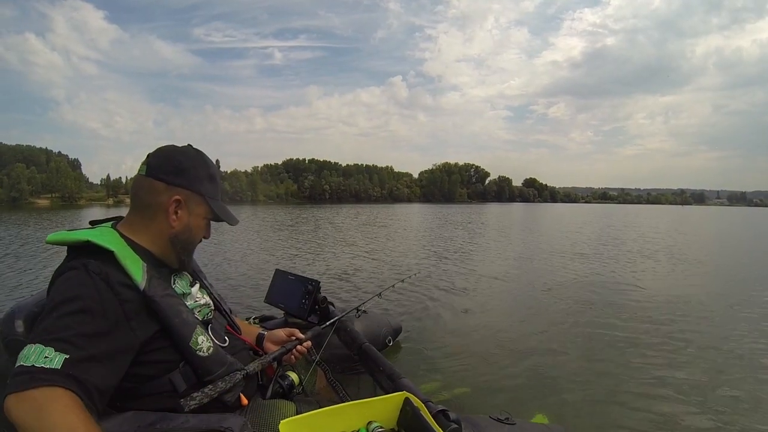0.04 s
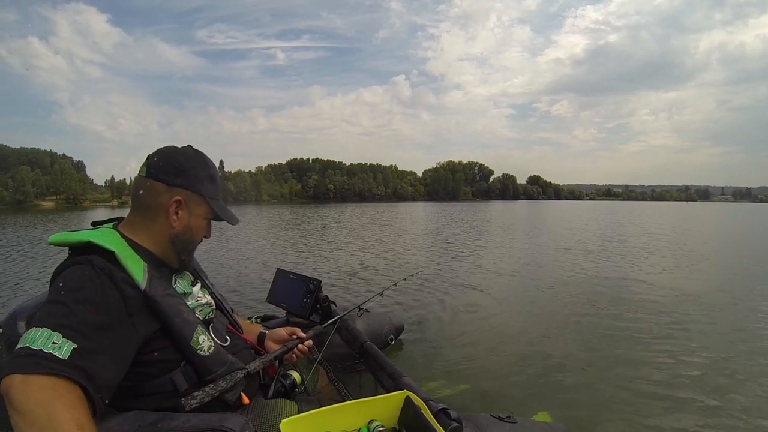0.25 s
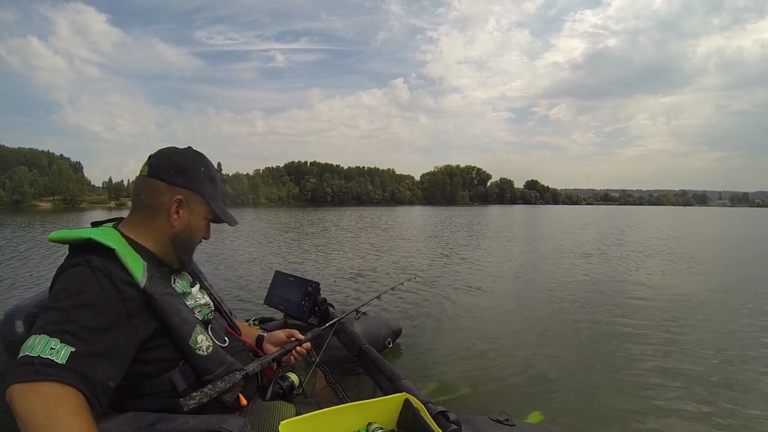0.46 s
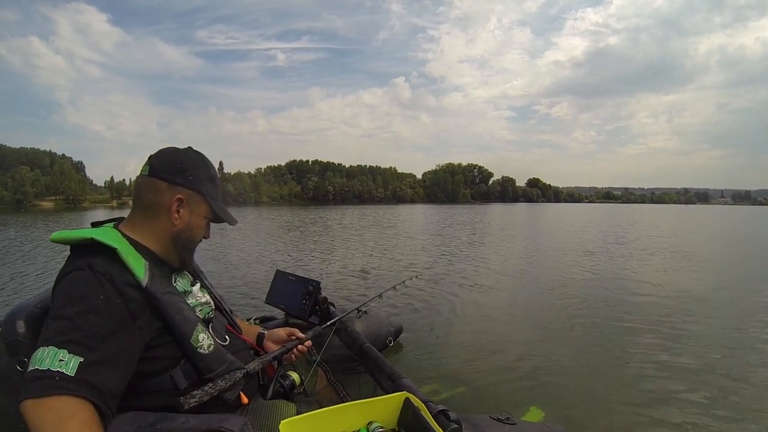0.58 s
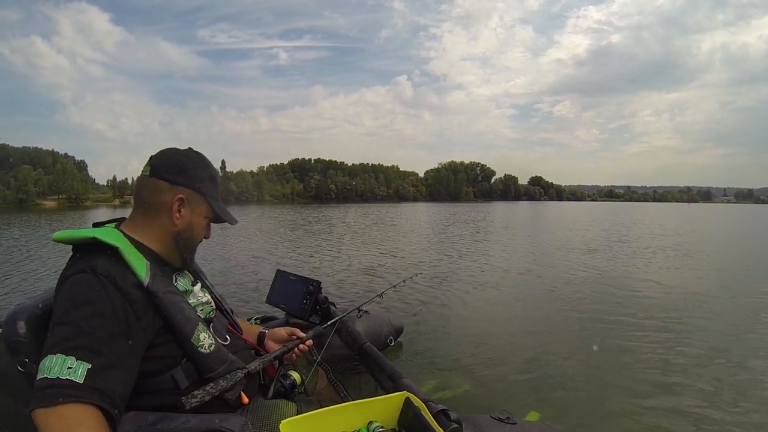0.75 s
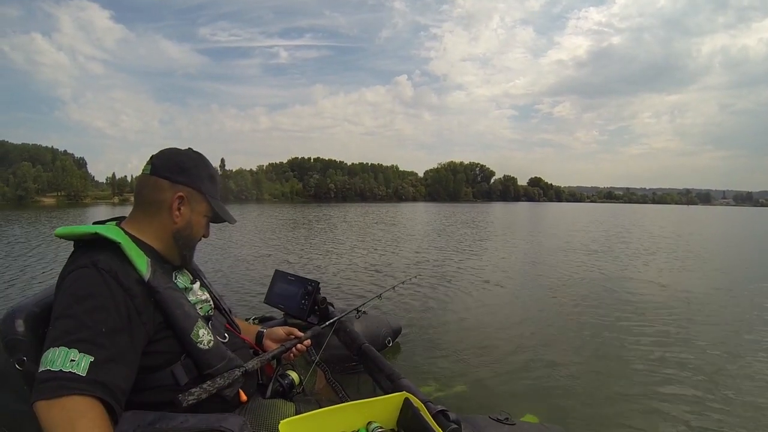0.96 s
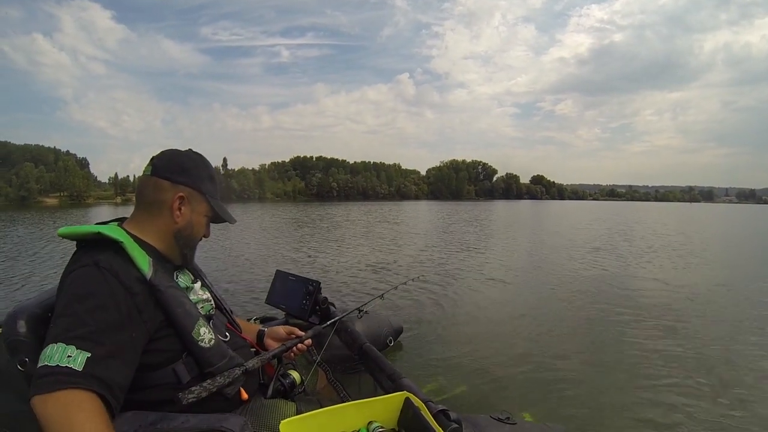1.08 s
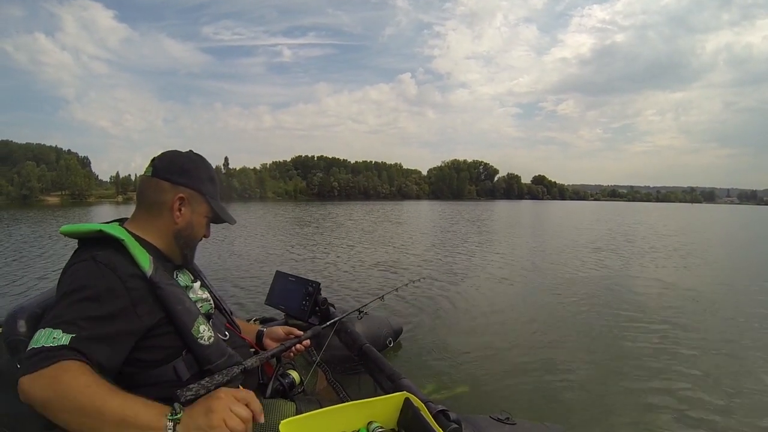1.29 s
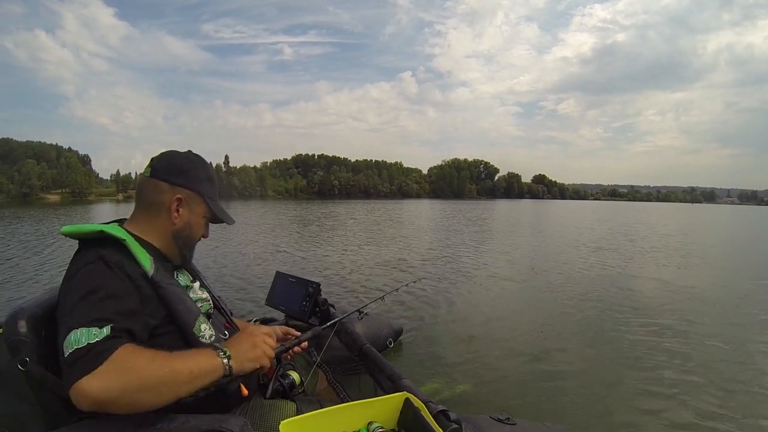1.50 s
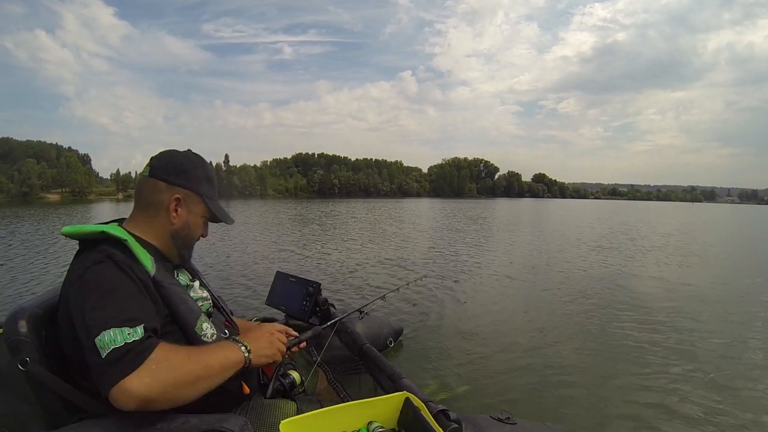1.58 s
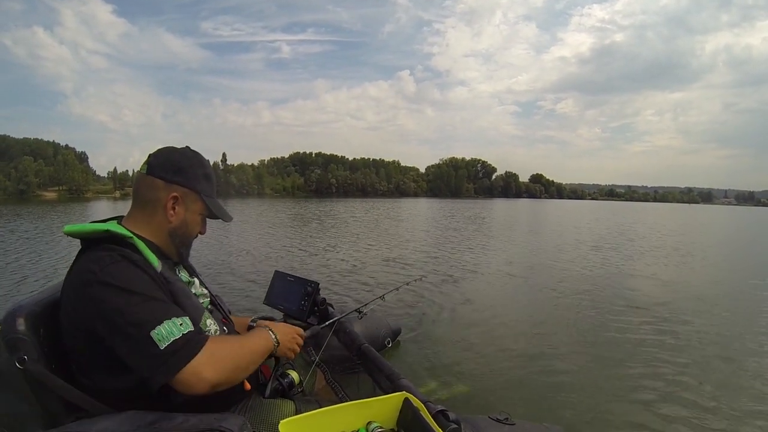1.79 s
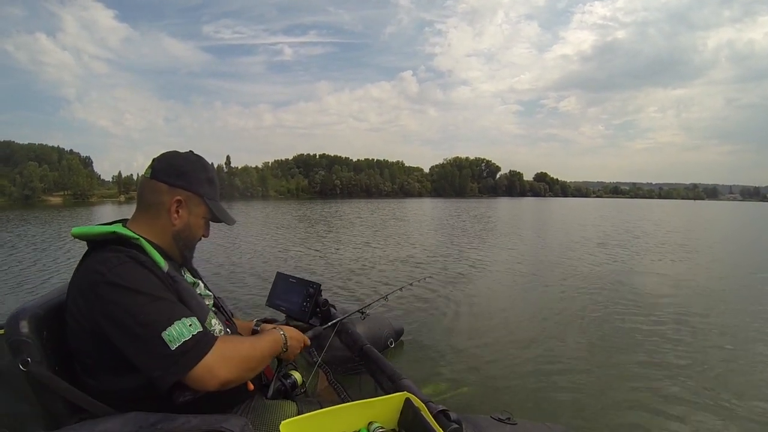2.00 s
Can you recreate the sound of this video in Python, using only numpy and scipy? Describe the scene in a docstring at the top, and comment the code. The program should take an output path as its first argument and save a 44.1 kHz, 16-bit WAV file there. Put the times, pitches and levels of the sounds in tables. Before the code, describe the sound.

A paddle strikes the water once with a loud, hollow plop, close to a small boat. Faint spray and scattered drips follow, over low wind rumble on the microphone and a soft motor hum on an open river.

```python
"""A clonk on a calm river

From a small boat, close up: an angler strikes the water once with a clonk, a paddle that drags air under.
The blade slaps, the air pocket throbs and pinches off as one loud rising bubble; spray and drips follow.
Behind it: wind on the microphone, the river's hush, a low motor hum, faint chirps and one far whistle."""
import sys
import numpy as np
from scipy import signal
from scipy.fft import rfft, irfft
from scipy.io import wavfile
from scipy.ndimage import uniform_filter1d

SR = 44100
rng = np.random.default_rng(int(sys.argv[2]) if len(sys.argv) > 2 else 0)


def to_wav(sig):
    """Store sig (one row per channel, or 1-D mono) as 16-bit WAV at the path in sys.argv[1].

    Samples outside -1..1 are clipped; the rate is SR.
    """
    pcm = np.clip(np.atleast_2d(sig), -1, 1) * 32767
    pcm = np.round(pcm).astype(np.int16)
    wavfile.write(sys.argv[1], SR, pcm.T)  # frames by channels


N = 90404
T = np.arange(N) / SR
LATE_SPLASH_S = 1.228  # the last shower of spray


def undb(db):
    """Decibels to gain."""
    return 10 ** (np.asarray(db) / 20)


def noise(colour):
    """Noise of rms 1, shaped by (f/Hz, relative level/dB) points and falling steeply outside them."""
    hz, db = np.array(colour, float).T
    f = np.maximum(np.arange(N // 2 + 1) * SR / N, 1)
    gain = undb(np.interp(np.log(f), np.log(hz), db))
    skirts = np.minimum(f / hz[0], 1) ** 2 * np.minimum(hz[-1] / f, 1) ** 2
    x = irfft(rfft(rng.standard_normal(N)) * gain * skirts, N)
    return x / x.std()


def drift(per_s):
    """Smooth random wander with a spread of 1."""
    step = max(int(SR / per_s), 1)
    x = uniform_filter1d(np.repeat(rng.standard_normal(N // step + 1), step), step)[:N]
    return x / x.std()


def tone(hz):
    """A sine that follows a pitch curve."""
    return np.sin(2 * np.pi * np.cumsum(hz) / SR)


def burst(at, rise_s, fall_s):
    """Exponential swell up to a moment and decay after it."""
    return np.exp(-np.maximum((at - T) / rise_s, (T - at) / fall_s))


def swell(at, width_s):
    """Bell-shaped envelope around a moment."""
    return np.exp(-((T - at) / width_s) ** 2)


def add_ring(out, at, hz, db, decay_s, octaves_per_s=0, rise_cycles=0.22):
    """Add a damped sine that may glide in pitch."""
    start = int(np.clip(at * SR, 0, N - 1))
    t = T[:min(int(10 * decay_s * SR), N - start)]
    envelope = (1 - np.exp(-t * hz / rise_cycles)) * np.exp(-t / decay_s)
    out[start:start + len(t)] += undb(db) * envelope * tone(hz * 2 ** (octaves_per_s * t))


def spatter(hits):
    """Water striking a surface: a very short band of noise for each hit."""
    # spectrum of a hit: multiple of its centre frequency, relative level/dB
    band = [(.35, -17), (1, 1.5), (1.7, -14)]
    out = np.zeros(N)
    for at, hz, db in hits:
        hiss = noise([(multiple * hz, band_db) for multiple, band_db in band])
        out += undb(db) * hiss * burst(at, rise_s=0.00025, fall_s=0.001)
    return out


def wind_and_river():
    """Wind rumbles on the microphone over the even hush of the river."""
    # course of the wind: t/s, level/dB
    gusts = [(0, -49.5), (0.079, -40.5), (.2, -41.5), (.4, -57.5), (.68, -49.5), (.9, -43.5), (1.3, -45),
             (1.501, -48), (1.6, -40), (1.76, -42), (1.85, -48.5)]
    # spectrum of the wind: f/Hz, relative level/dB
    rumble = [(12, -10), (30, 3), (55, -5), (90, -11.5), (180, -22.5), (400, -56.5)]
    # spectrum of the river: f/Hz, relative level/dB
    hush = [(180, -2.5), (300, -3), (500, -8.5), (1150, -9.5), (1800, -19), (4500, -28), (6000, -25.5),
            (7300, -31), (9200, -37.5), (10200, -31.5), (11500, -41.5), (15000, -42.5)]
    times, db = np.array(gusts).T
    return undb(np.interp(T, times, db)) * noise(rumble) + undb(-54) * noise(hush)


def motor():
    """A low motor hum that flutters and slowly sags in pitch."""
    # course of the hum: t/s, f/Hz, level/dB
    course = [(0, 127.5, -45), (.35, 127.8, -51.5), (0.699, 125.8, -48), (1.3, 123.1, -49.5),
              (1.47, 122.2, -61.5), (1.65, 121.6, -52), (2.05, 120.7, -51.5)]
    # its partials: multiple of the pitch, relative level/dB
    partials = [(1, 2.5), (1.5, -11.5), (2, -9.5)]
    times, hz, db = np.array(course).T
    pitch = np.interp(T, times, hz) * (1 + 0.0027 * drift(12))
    hum = sum(undb(level + 0.84 * drift(17)) * tone(multiple * pitch) for multiple, level in partials)
    return undb(np.interp(T, times, db)) * hum


def far_calls():
    """In the distance: insect-like chirps at an even pace and one thin whistle of a bird."""
    pulses = sum(swell(at, width_s=0.0063) for at in np.arange(0.995, T[-1], 0.25))
    chirps = pulses * tone(5400 * (1 + 0.005 * drift(300)))
    whistle_s = 1.912
    whistle = swell(whistle_s, width_s=0.037) * tone(3100 + 500 * (T - whistle_s))
    return undb(-62.5) * chirps + undb(-62) * whistle


def spray():
    """Thrown water falls back on the river as showers of tiny ringing bubbles."""
    # showers: centre t/s, spread/s, rate/(drops/s), lowest f/Hz, highest f/Hz, level/dB, decay/cycles
    showers = [(.40, .068, 2200, 700, 3900, -50, 3.3), (.53, 0.01, 299, 420, 959, -58, 6),
               (.575, .04, 2600, 992, 5548, -49.7, 2.9), (.70, .21, 500, 2300, 11000, -63, 2),
               (LATE_SPLASH_S, .035, 1200, 1000, 2600, -54.5, 3)]
    out = np.zeros(N)
    for centre, spread, rate, low_hz, high_hz, db, cycles in showers:
        shower = np.zeros(N)
        for when, pitch, size in rng.random((int(2 * np.pi * spread * rate), 3)):
            hz = low_hz * (high_hz / low_hz) ** pitch
            offset = np.pi * (2 * when - 1)  # in spreads from the centre
            fade_db = 20 * np.log10(np.exp(-offset ** 2 / 2))
            scatter_db = 3.6 * min(-np.log(size), np.pi)
            at = centre + spread * offset
            add_ring(shower, at, hz, fade_db + scatter_db, cycles / hz, rise_cycles=1.2)
        centre_rms = np.sqrt(np.sum(shower ** 2) / (spread * SR * np.sqrt(np.pi)))
        out += undb(db) * shower / centre_rms
    return out


def drips():
    """Single drops beside the boat: some ring a small bubble, others only tick on the surface."""
    # ticking drops: t/s, centre f/Hz, level/dB
    ticks = [(.401, 2500, -41), (.5075, 8000, -50), (.544, 3300, -47), (.551, 10000, -49),
             (.5775, 7500, -47), (.5775, 2200, -39), (.701, 5300, -48), (.7845, 7500, -51),
             (.815, 13000, -48), (.863, 6500, -50), (.9075, 4801, -44), (.9765, 4370, -46),
             (1.0842, 5400, -43), (1.202, 2400, -45), (1.2202, 3000, -40), (1.2202, 8500, -50),
             (1.232, 5500, -47), (1.2352, 8800, -50), (1.25, 4000, -48)]
    # drops that trap a bubble: t/s, f/Hz, level/dB, decay/s, glide/(octaves/s)
    bubbles = [(.188, 4400, -39, .002, -2), (.3095, 503, -32, 0.0085, 17), (0.3176, 3590, -40, 0.0024, -3),
               (.360, 1273, -36.5, 0.0067, 22), (0.4182, 2230, -38, .003, -5),
               (.472, 714, -37.5, 0.0044, 7), (.528, 660, -48, .022, -11), (.577, 1550, -37, 0.004, 9),
               (.6215, 4140, -34, 0.0016, -12), (.6225, 1023, -37, 0.0039, -6),
               (.653, 1870, -37.5, 0.003, 7), (0.8342, 3610, -44, 0.003, 8),
               (0.9342, 3320, -39.5, 0.003, -5), (1.221, 2050, -37, 0.0017, -3),
               (1.2313, 1230, -29, 0.0055, -15), (1.2312, 3050, -34, 0.001, -3),
               (1.233, 1570, -30.5, 0.0016, -11), (1.3251, 1930, -45, 0.006, -13)]
    out = spatter(ticks)
    for bubble in bubbles:
        add_ring(out, *bubble)
    return out


def blade_slap():
    """A faint hiss swells, the blade hits the water and rings; the surface tears shut behind it."""
    # spectrum of the slap: f/Hz, relative level/dB
    slap_colour = [(350, 11), (850, -10), (1500, 0), (2100, -3), (2400, -11), (3000, -0.5), (4000, -9),
                   (5400, -18), (7700, -8), (9500, -27), (15000, -35)]
    # modes of the blade: f/Hz, level/dB, decay/s
    modes = [(300, -8, 0.0022), (1150, -11, 0.0018), (1330, -8.5, 0.0019), (1590, -16, 0.0021),
             (2082, -15.5, 0.0033), (2690, -18.5, 0.0031)]
    # sheets of water smacking back on the blade: t/s, centre f/Hz, level/dB
    smacks = [(.2116, 3180, -18), (.216, 2700, -27)]
    # spectrum of the tearing surface and of the lead-in hiss: f/Hz, relative level/dB
    tear_colour = [(850, -20), (1240, 0), (1700, -6), (2390, -1), (5140, -15), (6350, -30), (8430, -22),
                   (15000, -43)]
    slap = undb(-20) * noise(slap_colour) * burst(0.2095, rise_s=0.0028, fall_s=0.003)
    for hz, db, decay_s in modes:
        add_ring(slap, 0.2082, hz, db, decay_s, rise_cycles=0.35)
    lead_in_hiss = undb(-46.5) * swell(0.196, width_s=0.011)
    tear = undb(-36.5) * burst(0.226, rise_s=0.0023, fall_s=0.02)
    return slap + spatter(smacks) + noise(tear_colour) * (lead_in_hiss + tear)


def plop():
    """The open air pocket throbs low, then shuts into a bubble that shoots up in pitch; a weak echo."""
    # rings as the bubble pinches off: f/Hz, level/dB, decay/s
    snap = [(3450, -28, 0.0022), (7900, -36, .0008)]
    open_s, pocket_hz, sag_hz_per_s = 0.2068, 111.6, 1500
    shut_s, from_hz, to_hz, glide_s = 0.2268, 216, 440, 0.00465
    hold_s, fall_s, echo_s = 0.0059, 0.0054, 0.0235
    since_open, since_shut = np.maximum(T - open_s, 0), np.maximum(T - shut_s, 0)
    closed = 1 - np.exp(-(since_shut / 0.0011) ** 2)  # crossfade from pocket to bubble

    throb = (1 - np.exp(-since_open / 0.00039)) * np.exp(-since_open / 0.017)
    pocket = undb(-7) * throb * tone((pocket_hz - sag_hz_per_s * since_open) * (since_open > 0))

    bubble_hz = to_hz + (from_hz - to_hz) * np.exp(-since_shut / glide_s)
    hold_then_fall = np.exp(-np.logaddexp(0, 2 * (since_shut - hold_s) / fall_s) / 2)
    bubble = undb(0.97) * closed * hold_then_fall * tone(bubble_hz * (since_shut > 0))
    echo = undb(-31) * np.interp(T - echo_s, T, bubble)

    out = pocket * (1 - closed) + bubble + echo
    for hz, db, decay_s in snap:
        add_ring(out, 0.229, hz, db, decay_s)
    return out


def scene():
    """Everything as heard from the boat, in mono."""
    return (blade_slap() + plop() + drips() + spray() + wind_and_river() + motor() + far_calls())[None]


def record(dry):
    """The microphone has a dip in the treble and cuts the very top."""
    dip_hz, dip_db, top_hz = 6780, -8.5, 15100
    notched = signal.lfilter(*signal.iirnotch(dip_hz, Q=2.8, fs=SR), dry)
    dipped = notched + undb(dip_db) * (dry - notched)
    return signal.sosfilt(signal.ellip(8, 0.2, 80, top_hz, fs=SR, output="sos"), dipped)


dry = scene()
out = record(dry)
to_wav(out)
```